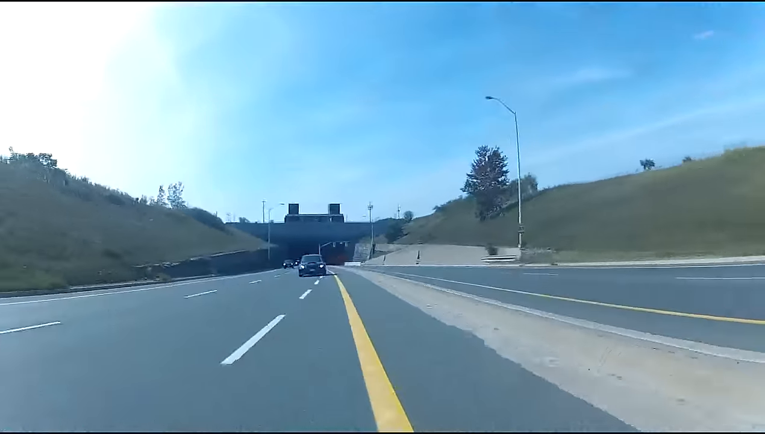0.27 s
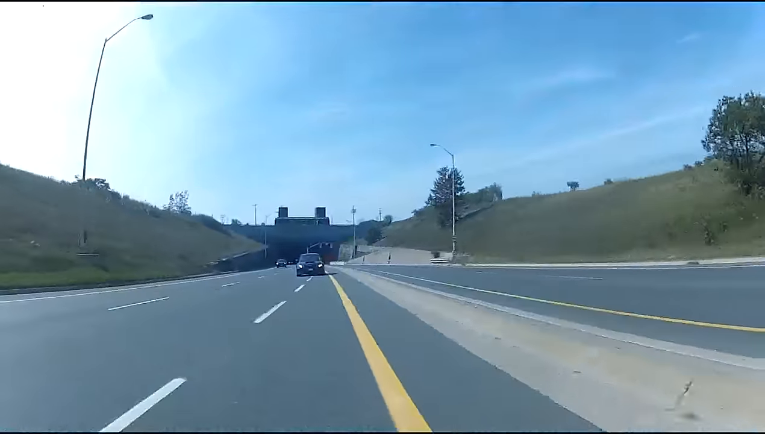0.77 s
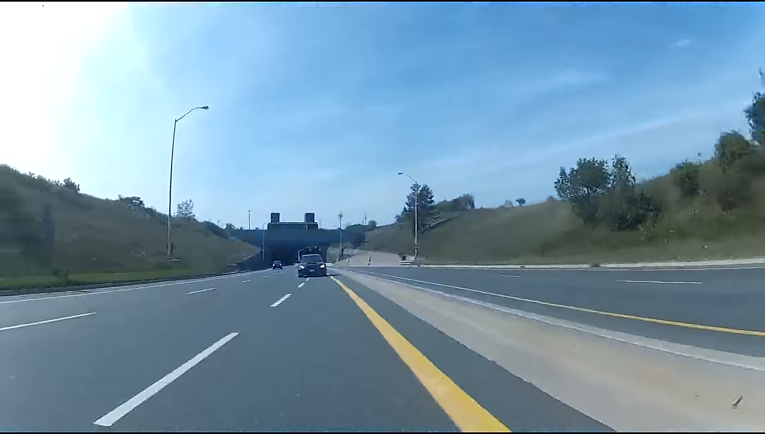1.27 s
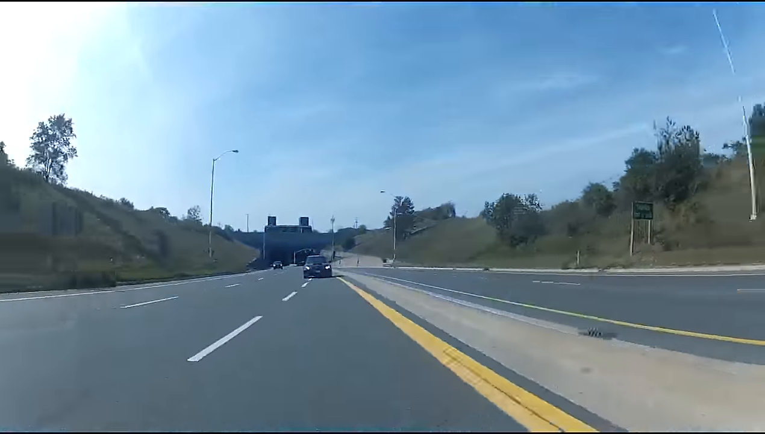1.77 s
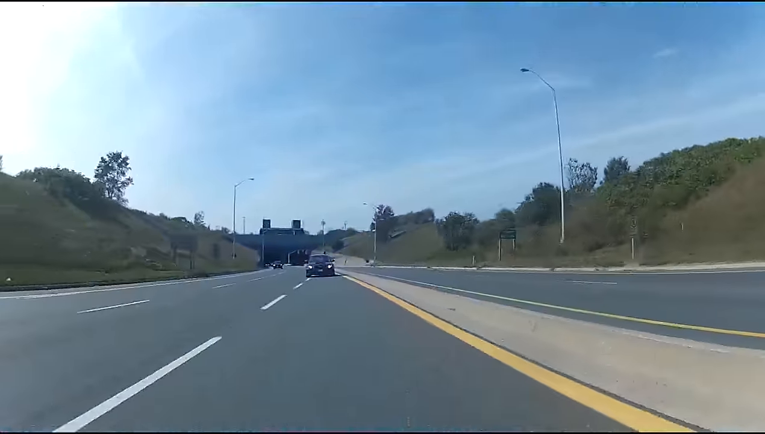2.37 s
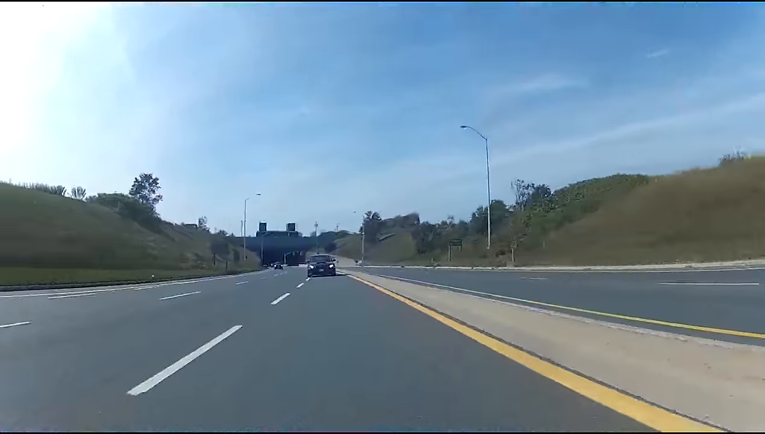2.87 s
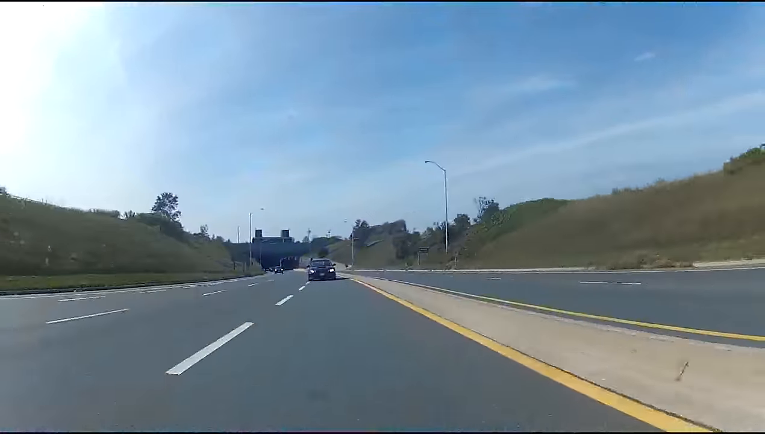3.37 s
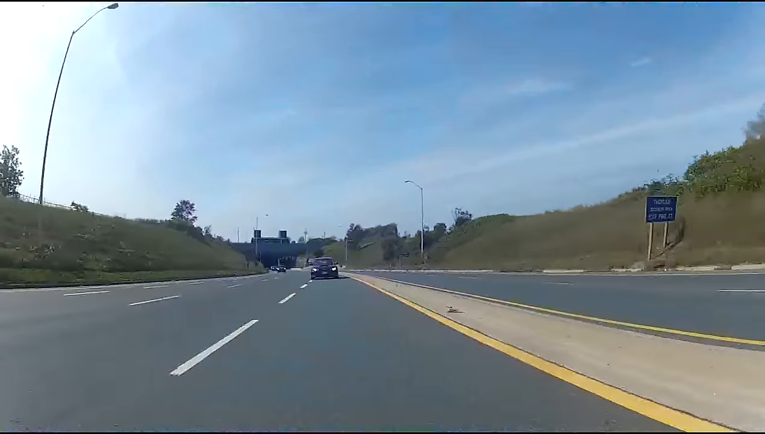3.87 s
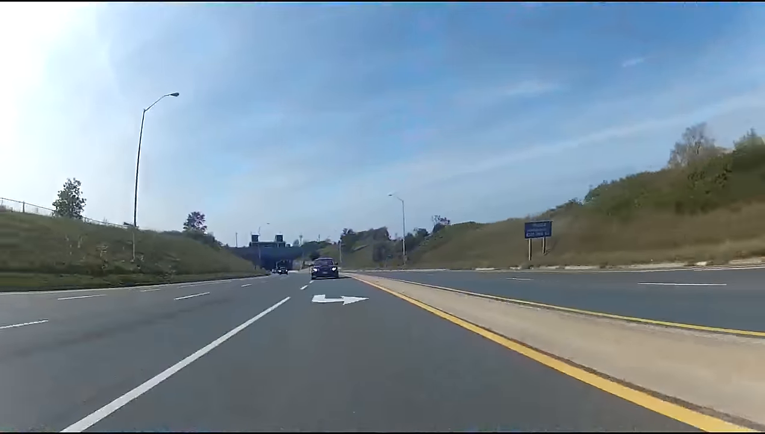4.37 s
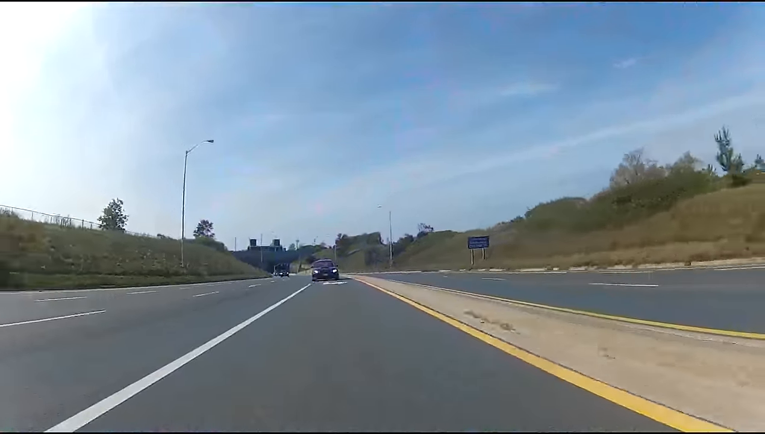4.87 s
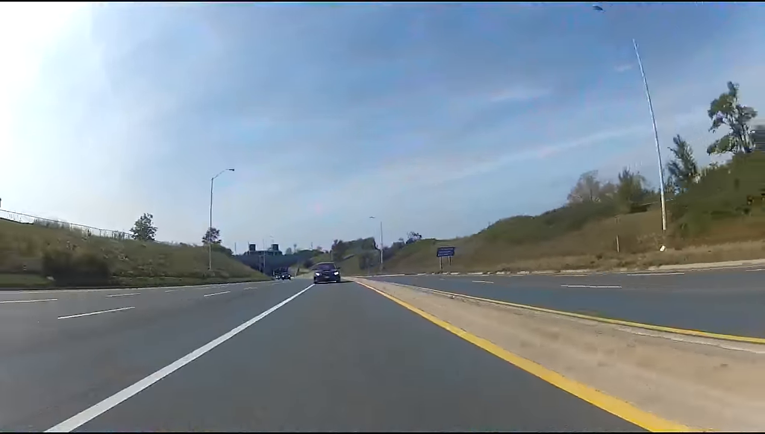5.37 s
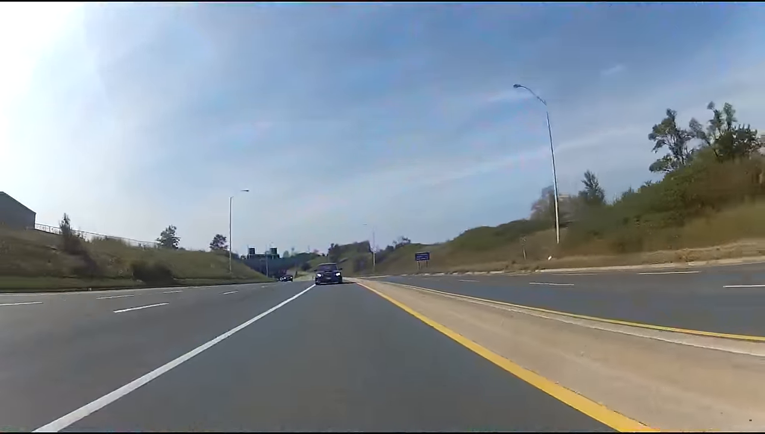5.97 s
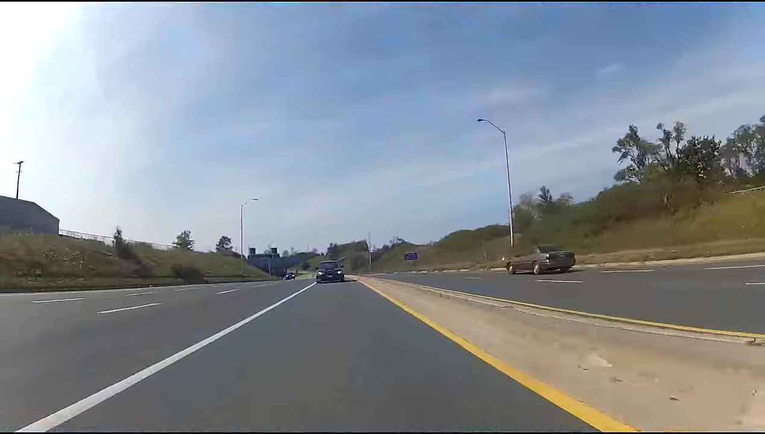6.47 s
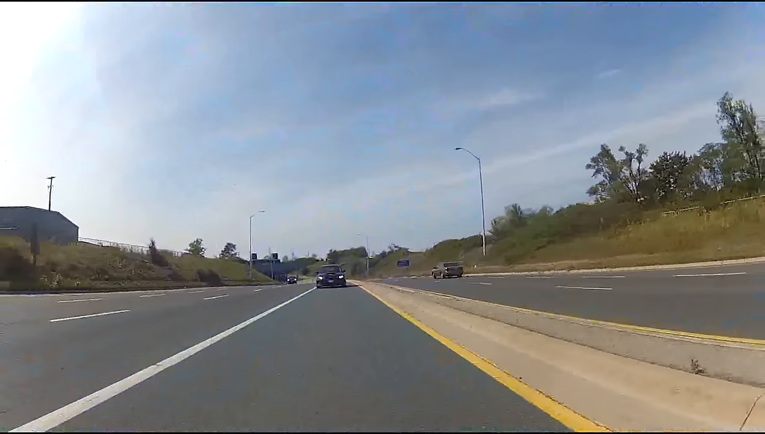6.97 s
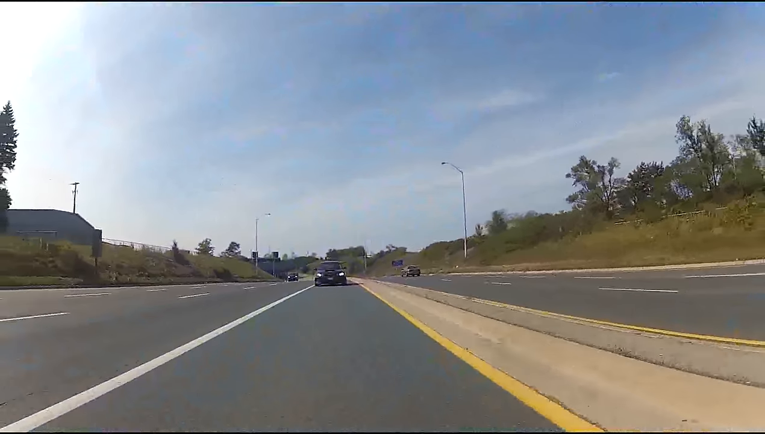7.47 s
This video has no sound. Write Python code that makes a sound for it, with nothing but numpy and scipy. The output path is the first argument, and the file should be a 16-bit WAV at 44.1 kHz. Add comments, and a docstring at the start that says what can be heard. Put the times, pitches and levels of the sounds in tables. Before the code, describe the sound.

Low wind rumble and road noise from a slowing car, with a sinking exhaust drone, a few knocks and small rattles.

```python
"""Wind buffets the microphone of a camera riding on a fast car along an open highway, over rushing air
and tyre roar. The exhaust drones, blips through a downshift and falls as the car slows on its engine.
Close up, the mount rattles, bumps knock the body and grit ticks on the camera's case; late on, one car
hisses past on the other carriageway. The camera samples at 12 kHz and holds each sample, which mirrors
the sound into a thin treble fizz."""
import sys
import numpy as np
from scipy import signal
from scipy.fft import rfft, irfft
from scipy.io import wavfile
from scipy.ndimage import uniform_filter1d, map_coordinates

SR = 44100
rng = np.random.default_rng(int(sys.argv[2]) if len(sys.argv) > 2 else 0)


def dump_mix(stems):
    """Bounce the given channels to the path in sys.argv[1] as a 16-bit WAV at rate SR."""
    frames = np.atleast_2d(stems).T  # one column per channel
    limited = np.clip(frames, -1, 1)  # hard clip at full scale
    pcm = np.round(limited * 32767).astype(np.int16)
    wavfile.write(sys.argv[1], SR, pcm)


N = 341334
TIME = np.arange(N) / SR
FREQS = np.maximum(np.arange(N // 2 + 1) * SR / N, 1)
CLUTCH_OUT_S, BLIP_S, CLUTCH_IN_S = 1.6, 1.83, 2.25

# Peaks and notches of the case around the microphone. Each row: centre in Hz, width in Hz, gain in dB.
CASE_COLOUR = [(736, 48, -8.5), (837, 25, 4), (869.6, 40, -9.5), (931, 67, 5), (1067, 90, 3),
               (1200, 320, -0.5), (1608, 160, -10.5), (1966, 180, 3.5), (2200, 68, -5.5), (2233, 84, 7),
               (3600, 176, 8)]


def undb(db):
    """Decibels to gain."""
    return 10 ** (np.asarray(db) / 20)


def unit(x):
    """Scale to rms 1."""
    return x / np.sqrt(np.mean(x ** 2))


def curve(table):
    """Rows of time and value, joined by straight lines."""
    return np.interp(TIME, *np.transpose(table))


def walk(rate):
    """Smooth random wander of spread 1, with swings up to the given rate a second."""
    steps = TIME * 2 * rate
    points = rng.standard_normal(int(steps[-1]) + 2)
    return unit(map_coordinates(points, [steps], order=2, mode="nearest"))


def noise(spectrum, bells=()):
    """Noise of rms 1 with a given spectrum, and peaks and notches on top."""
    hz, db = np.transpose(spectrum)
    shape_db = np.interp(np.log(FREQS), np.log(hz), db)
    for centre, width, height in bells:
        shape_db += height * .5 ** ((2 * (FREQS - centre) / width) ** 2)
    return unit(irfft(rfft(rng.standard_normal(N)) * undb(shape_db), N))


def firing_phase(hz, jitter):
    """Phase of the engine's firings, whose rate is slightly unsteady."""
    return 2 * np.pi * np.cumsum(hz * (1 + jitter * walk(23))) / SR


def strikes(events, modes, chatter_s, crack, detune, soft_hz):
    """Each blow is a dying burst of tiny contacts ringing the modes; its loudest 3 ms set its level."""
    out, t = np.zeros(N + SR), np.arange(SR // 4) / SR
    hz, db, t60 = np.transpose(modes)[:, :, None]
    softness = signal.butter(6, soft_hz, fs=SR, output="sos")
    burst = np.exp(-t / chatter_s) * (1 - np.exp(-t / (0.073 * chatter_s)))
    for start_s, blow_db in events:
        contacts = signal.sosfilt(softness, rng.laplace(size=len(t)) * burst)
        pitch = hz * (1 + detune * rng.standard_normal(hz.shape))
        decay = np.exp(-np.log(1000) * t / t60)
        ring = np.sum(undb(db) * decay * np.sin(2 * np.pi * pitch * t), axis=0)
        ring[0] += crack  # the contacts heard directly
        hit = signal.fftconvolve(contacts, ring)[:len(t)]
        loudest = np.sqrt(uniform_filter1d(hit ** 2, SR // 333).max())
        start = int(start_s * SR)
        out[start:start + len(t)] += undb(blow_db) * hit / loudest
    return out[:N]


def wind_and_boom(speed):
    """Low buffeting right at the microphone and engine boom, sinking in pitch as the car slows."""
    # Gusts on the case. Each row: time in seconds, relative level in dB.
    gusts = [(0, -15), (.2, -18.5), (.7, -18), (1.2, -19.5), (2.3, -19), (2.53, -16), (3.0, -25.5),
             (3.5, -22), (4.0, -25.5), (4.3, -22), (5.4, -23.5), (6.05, -33.5), (6.4, -27), (6.65, -38),
             (6.9, -27), (7.25, -34.5), (7.74, -28)]
    # Spectra of the boom and a rough rumble. Each row: frequency in Hz at pitch 1, relative density in dB.
    boom_spectrum = [(8, -35), (15, -19), (25, -16), (36, -2), (46, -9.5), (60, -1), (73, 3.5), (90, -2),
                     (120, -19), (200, -47.5), (400, -89)]
    rumble_spectrum = [(30, -21), (65, -19.5), (98, -0.5), (125, 1), (170, 1), (205, -4.5), (245, -15),
                       (320, -22.5), (500, -43), (2000, -76)]
    boom_pitch = 1.06 * speed ** .55
    boom = map_coordinates(noise(boom_spectrum), [np.cumsum(boom_pitch)], order=1, mode="grid-wrap")
    rumble = map_coordinates(noise(rumble_spectrum), [np.cumsum(boom_pitch ** .3)],
                             order=1, mode="grid-wrap")
    # within a gust the pressure swings stay about equally strong
    boom = unit(boom / uniform_filter1d(boom ** 2, SR // 7) ** 0.46)
    rumble_db = -23.5 + 7.5 * np.log2(speed) + 1.27 * walk(14)
    return undb(curve(gusts) - 1.58) * boom + undb(rumble_db) * rumble


def tyres_and_air(speed):
    """Tyre roar and rushing air, heard through the case, fall with speed and flutter with turbulence."""
    # Spectra of the tyres and the air. Each row: frequency in Hz, relative density in dB.
    roar = [(120, 5), (260, 1), (360, -1.5), (460, 3.5), (660, 1.5), (800, -18.5), (1200, -49),
            (2500, -68.5)]
    rush = [(300, -5), (650, -6), (850, 0), (1050, -2), (1300, -2.5), (1900, -6.5), (2350, -10),
            (2600, -18), (2950, -19.5), (3250, -27.5), (4150, -27.5), (4500, -33.5), (5400, -35),
            (5800, -44)]
    halvings, flutter = -np.log2(speed), walk(41)
    roar_db = -36 - 9.5 * halvings + 2.2 * flutter + 0.51 * walk(90)
    rush_db = -32 - 12.5 * halvings + 0.34 * flutter + .5 * walk(9.2)
    return undb(roar_db) * noise(roar, CASE_COLOUR) + undb(rush_db) * noise(rush, CASE_COLOUR)


def exhaust(speed):
    """From on board, a drone pitched by road speed and gear; low-gear engine braking adds overtones."""
    # The drone at the firing rate. Each row: time in seconds, level in dB while in gear.
    drone_levels = [(0, -40), (.18, -21), (.47, -24.5), (.75, -35), (1.35, -27.5), (1.6, -46), (2.25, -42),
                    (2.42, -25), (3.15, -22), (3.75, -31.5), (4.4, -23.5), (5.25, -21.5), (5.4, -28.5),
                    (5.85, -28.5), (6.05, -40), (6.55, -31.5), (6.75, -23), (7.25, -24), (7.42, -33),
                    (7.55, -27.5), (7.74, -38)]
    # The engine's overtones, plus a faint gear or tyre whine in the last row.
    # Each row: multiple of the crankshaft rate, relative level in dB.
    overtones_and_whine = [(1, -53.5), (2, -36.5), (3, -40.5), (4, -48.5), (6, -45), (7, -51), (9, -56),
                           (10, -52), (12, -50.5), (14, -56), (15, -56), (17, -57), (19, -58), (20, -56.5),
                           (21, -59), (24, -59.5), (26.7, -54.5)]
    high_gear_hz, low_gear_hz = 133, 200  # firing rates at cruising speed
    cylinders, pipe_hz, pipe_width_hz = 10, 300, 123
    sag_s, sag_hz_per_s = 7.3, 42  # the clutch goes down again and the revs sink towards idle
    in_high_gear = np.clip((CLUTCH_OUT_S - TIME) * 10 + .5, 0, 1)
    in_low_gear = np.clip((TIME - CLUTCH_IN_S) * 10 + .5, 0, 1)
    firing_hz = speed * np.where(TIME < BLIP_S, high_gear_hz, low_gear_hz)
    firing_hz -= sag_hz_per_s * np.maximum(TIME - sag_s, 0)
    phase = firing_phase(firing_hz, jitter=.004)
    drone = undb(curve(drone_levels) + walk(18)) * np.sin(phase)
    # the third harmonic falls through a broad resonance of the pipe
    off_pipe = 2 * (3 * firing_hz - pipe_hz) / pipe_width_hz
    howl = undb(-46.5 + 2 * walk(12)) / (1 + off_pipe ** 8) * np.sin(3 * phase)
    crank_phase = phase / (cylinders / 2)  # half the cylinders fire each turn
    # the overtones and the whine waver in the airstream
    tones = sum(undb(db + 2.74 * walk(4.4)) * np.sin(multiple * crank_phase + 2 * np.pi * rng.random())
                for multiple, db in overtones_and_whine)
    tones *= (firing_hz / 165) ** 0.56  # louder at higher revs
    return np.sqrt(2) * ((in_high_gear + in_low_gear) * drone + in_low_gear * (howl + tones))


def mount_rattles():
    """Jolts set the mount chattering next to the microphone; four faint ones come at random moments."""
    # Jolts to the mount. Each row: start in seconds, relative level in dB.
    jolts = [(0.6099, -40), (0.6478, -41), (0.7356, -42.5), (0.7785, -43), (0.817, -49), (0.8623, -51),
             (1.4385, -51), (1.6276, -40.5), (1.669, -47), (1.8666, -51), (1.9549, -41.5), (3.0359, -39.5),
             (4.566, -45), (4.6068, -40.5), (4.6507, -49), (4.8413, -45.5), (5.463, -46.5), (5.5038, -48),
             (6.775, -45.5), (6.8138, -51), (6.9555, -49), (7.197, -51)]
    # The mount's modes. Each row: frequency in Hz, relative level in dB, seconds to fall 60 dB.
    mount_modes = [(1180, 12, 0.017), (2210, 10.5, 0.024), (2860, 8.5, 0.011), (3700, 2, 0.016),
                   (4030, 3, 0.013), (4240, -3, 0.016), (4790, 4.5, 0.016), (5240, 6.5, 0.017),
                   (5580, 2.5, 0.018)]
    faint = [(when * N / SR, -59 + 2.5 * (2 * size - 1)) for when, size in rng.random((4, 2))]
    return undb(2) * strikes(jolts + faint, mount_modes,
                             chatter_s=0.013, crack=10, detune=0.005, soft_hz=7600)


def body_knocks():
    """Bumps in the road knock the car's body and ring its panels."""
    # Bumps under the car. Each row: start in seconds, relative level in dB.
    bumps = [(.65, -19.5), (.722, -20), (1.028, -34), (1.646, -17.5), (1.769, -20), (1.978, -20),
             (2.645, -31), (3.046, -16), (3.171, -27), (4.609, -17), (4.707, -25), (4.846, -26),
             (4.883, -28), (4.972, -25), (5.057, -23.5), (5.3, -21.5)]
    # Panel modes. Each row: frequency in Hz, relative level in dB, seconds to fall 60 dB.
    panel_modes = [(200.5, 1.5, 0.35), (333, -10.5, 0.038), (452, -17, 0.026), (514, 3.5, 0.076),
                   (567, 2, 0.041), (652, 4.5, 0.048), (834, -13, .03), (1000, -20, 0.053),
                   (1120, -20, 0.033), (2040, -5.5, .015), (2390, -6.5, 0.021)]
    return undb(-6) * strikes(bumps, panel_modes, chatter_s=0.013, crack=1.2, detune=0.078, soft_hz=2340)


def throttle_blip():
    """A stab of throttle with the clutch out: the revs jump and the exhaust brightens for a moment."""
    from_hz, to_hz, rise_s, width_s = 110, 166.7, .28, 0.064
    climb = np.clip((TIME - BLIP_S) / rise_s + .5, 0, 1)
    phase = firing_phase(from_hz + (to_hz - from_hz) * climb, jitter=0.006)
    swell = undb(-24.5) * np.exp(-((TIME - BLIP_S) / width_s) ** 2)
    tone = np.sin(phase) + undb(-7) * np.sin(2 * phase) + undb(-26) * np.sin(3 * phase)
    return np.sqrt(2) * swell * tone


def grit_ticks():
    """Grit strikes the case and briefly rings its wall, right beside the microphone."""
    # Grains hitting the case. Each row: start in seconds, level in dB.
    grains = [(2.104, -27), (2.2263, -32.5), (2.8873, -30), (4.062, -36.5), (4.2198, -46), (4.707, -41),
              (5.277, -39), (5.426, -37), (5.632, -38.5), (5.7255, -42), (5.933, -42), (6.044, -44),
              (6.374, -42), (6.732, -41.5), (7.3527, -48), (7.454, -49)]
    # The wall's modes. Each row: frequency in Hz, relative level in dB, seconds to fall 60 dB.
    wall_modes = [(2415, 16.5, 0.012), (2760, 3, 0.0099), (3120, -1, 0.0034), (3380, -3, .005),
                  (3960, -1.5, 0.0085), (4170, -6, 0.0058)]
    return strikes(grains, wall_modes, chatter_s=0.0026, crack=.3, detune=0.068, soft_hz=4250)


def oncoming_car(pass_s, approach_s, leave_s, peak_db):
    """Tyre hiss from across on the other carriageway, fading with distance from the microphone."""
    # Spectrum of its tyres. Each row: frequency in Hz, relative density in dB.
    tyre_hiss = [(300, -15), (750, -10), (1100, -5), (1900, 5.5), (2500, 5), (3200, -7), (4300, -16),
                 (5900, -15.5)]
    distance = (TIME - pass_s) / np.where(TIME < pass_s, approach_s, leave_s)
    return undb(peak_db) * noise(tyre_hiss, CASE_COLOUR) / (1 + distance ** 4)


def scene():
    """Everything as it reaches the camera's one microphone, over its own faint hiss."""
    # The car slowing down. Each row: time in seconds, speed as a share of cruising speed.
    slowing = [(0, .997), (.45, .999), (.95, .985), (1.6, .917), (2.3, .888), (2.75, .879), (3.1, .86),
               (4.1, .794), (5.0, .724), (5.4, .678), (5.85, .63), (6.3, .569), (6.75, .517), (7.0, .482),
               (7.3, .445), (7.74, .41)]
    speed = curve(slowing)
    impacts = mount_rattles() + grit_ticks() + body_knocks()
    passing = oncoming_car(pass_s=6.31, approach_s=0.29, leave_s=0.36, peak_db=-47)
    hiss = undb(-64.5) * rng.standard_normal(N)
    engine = exhaust(speed) + throttle_blip()
    return (engine + wind_and_boom(speed) + tyres_and_air(speed) + impacts + passing + hiss)[None]


def record(dry):
    """The camera's sample and hold mirrors the sound about half its sample rate; then the top is cut."""
    band_hz, sample_hz, top_hz = 5740, 12000, 15250
    band = signal.sosfiltfilt(signal.butter(16, band_hz, fs=SR, output="sos"), dry)
    band = band * signal.get_window(("tukey", .001), N)
    mirrored = band * (1 + 2 * np.cos(2 * np.pi * sample_hz * TIME))
    held = irfft(rfft(mirrored) * np.sinc(FREQS / sample_hz), N)  # holding dulls the treble
    return signal.sosfilt(signal.ellip(8, .2, 70, top_hz, fs=SR, output="sos"), held)


dry = scene()
out = record(dry)
dump_mix(out)
```